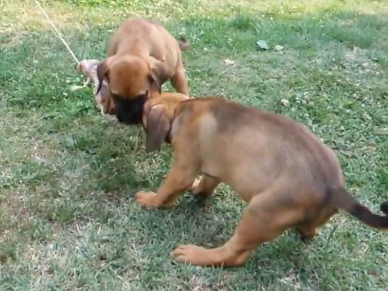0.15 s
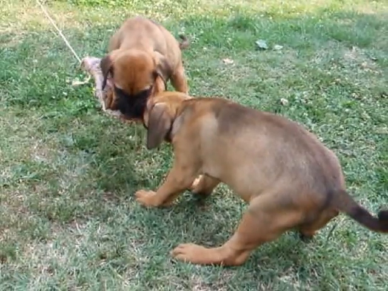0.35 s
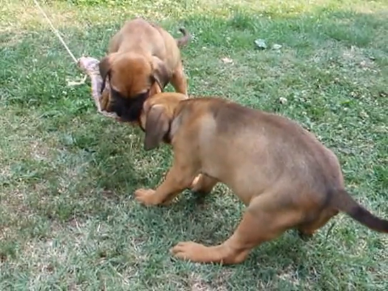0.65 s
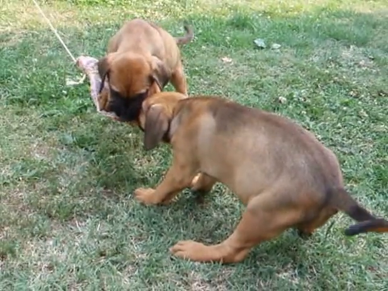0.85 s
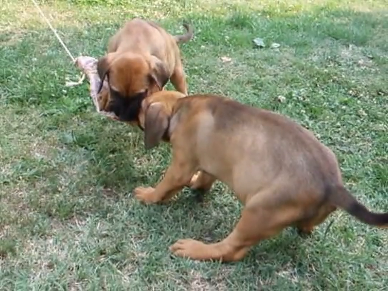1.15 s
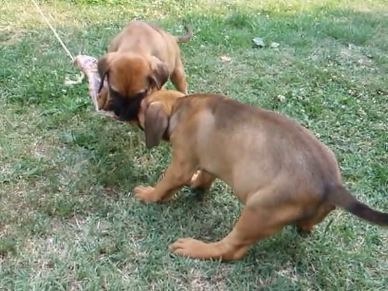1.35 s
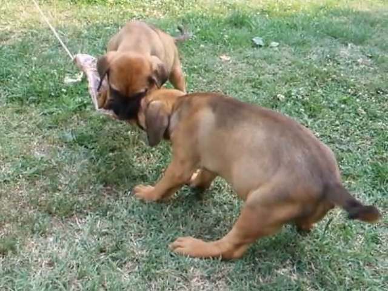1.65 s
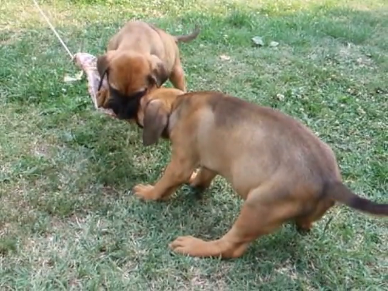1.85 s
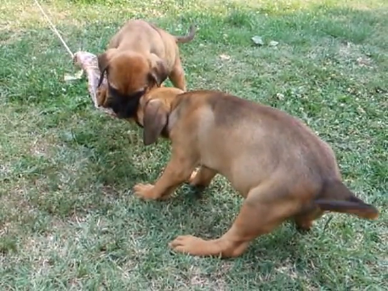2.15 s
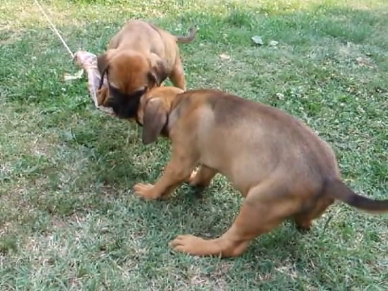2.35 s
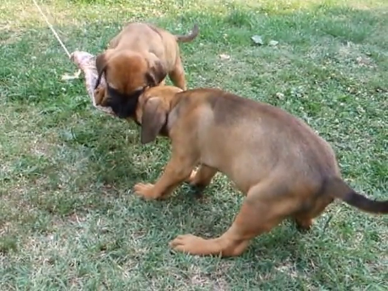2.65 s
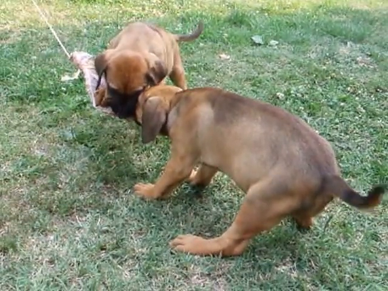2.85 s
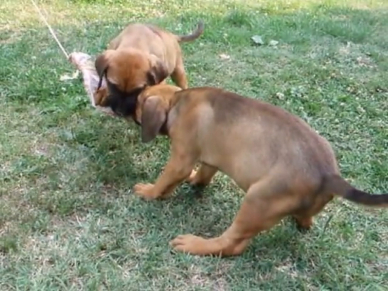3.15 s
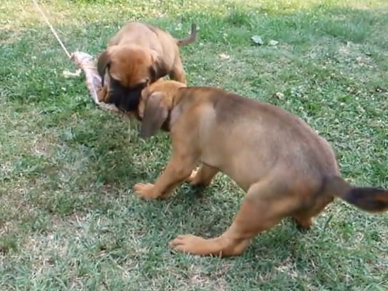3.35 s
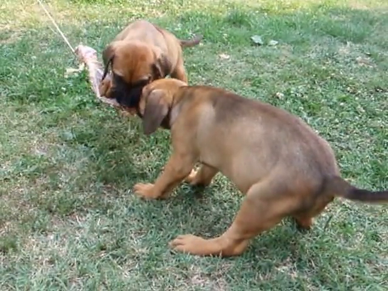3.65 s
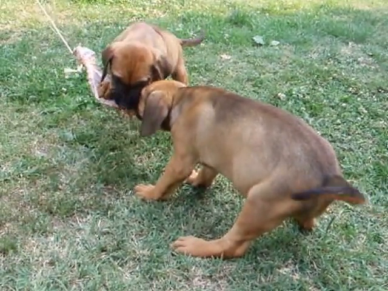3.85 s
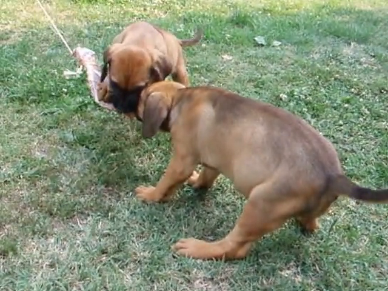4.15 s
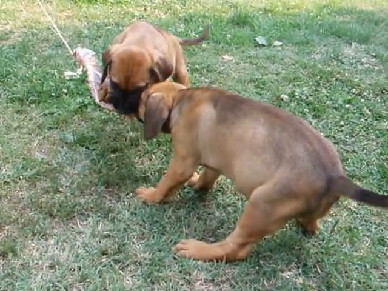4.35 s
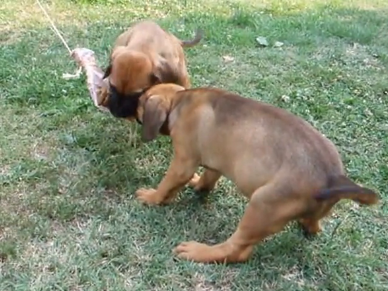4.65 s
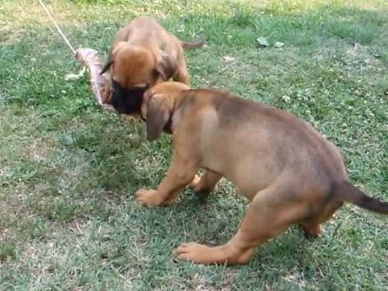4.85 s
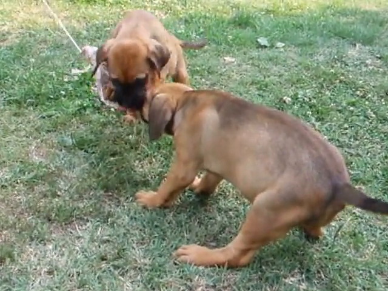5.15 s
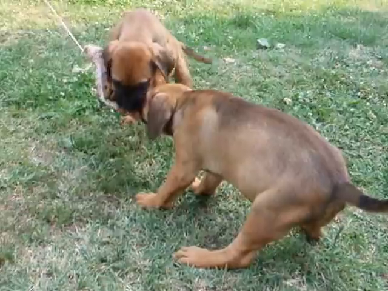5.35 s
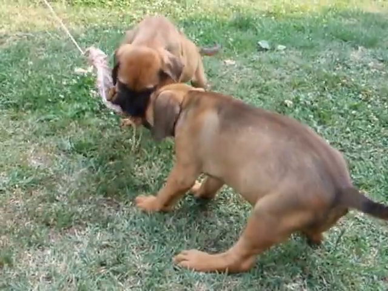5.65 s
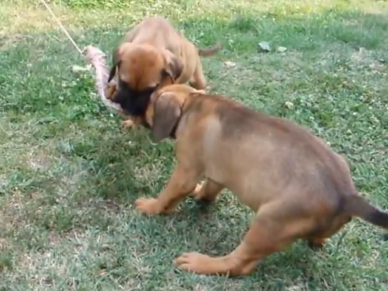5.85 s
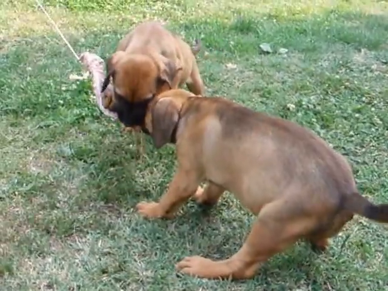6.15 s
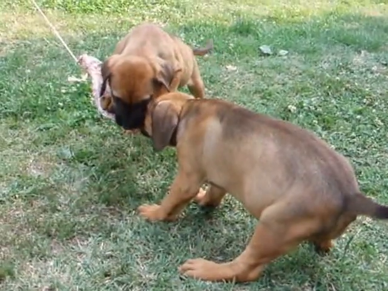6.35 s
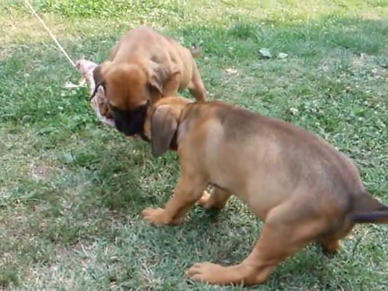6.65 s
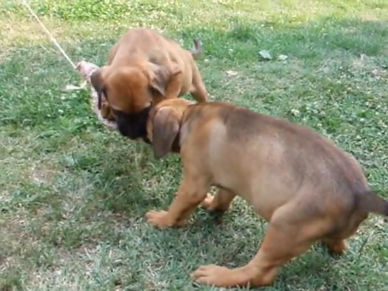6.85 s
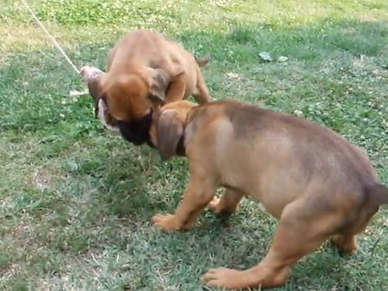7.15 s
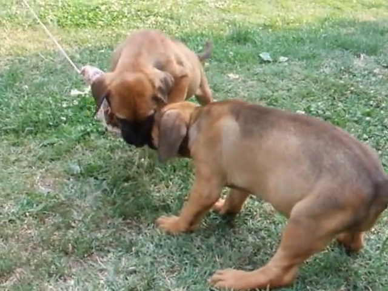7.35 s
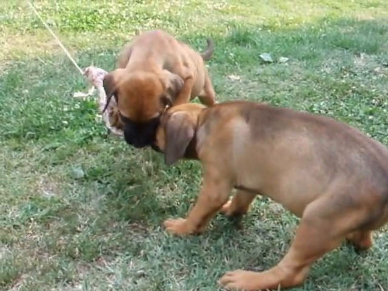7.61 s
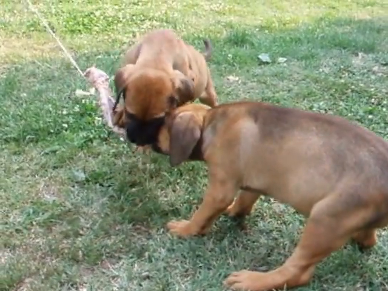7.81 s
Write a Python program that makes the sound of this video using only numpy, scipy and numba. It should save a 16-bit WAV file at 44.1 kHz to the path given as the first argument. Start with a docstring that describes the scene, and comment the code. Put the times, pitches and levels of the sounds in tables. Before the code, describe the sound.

Playful puppy growling carries on close to a small microphone in a yard with a weak echo. Five sharp yelps burst out of the growls in the first two thirds, and short snarls take over near the end. A quiet closed-mouth growl fills the gaps. Behind the dogs are a few faint bird whistles, a soft hiss of air and a steady thin whine.

```python
"""Two puppies tug at a toy on a lawn, over soft outdoor air and a small camera's thin whine.
First one growls, its vocal folds pulsing through chest, mouth and throat, while a far bird whistles.
At 1.4 s the growl breaks upward into a yelp; at 2.5 s it swells into a snarl. In the pause after it,
a faint slow growl rattles through a shut mouth, and it returns twice later. Four more yelps come from
3.2 to 5.5 s, then three snarls. The yard echoes weakly, and the hardest pulses overload the recorder."""
import sys
import numpy as np
from scipy import signal
from scipy.fft import rfft, irfft
from scipy.io import wavfile
from scipy.ndimage import uniform_filter1d
from numba import njit

SR = 44100
rng = np.random.default_rng(int(sys.argv[2]) if len(sys.argv) > 2 else 0)


def store_wav(level_fs):
    """Save 16-bit WAV to argv[1]."""
    pcm = np.round(np.clip(np.atleast_2d(level_fs), -1, 1) * 32767)
    wavfile.write(sys.argv[1], SR, pcm.T.astype(np.int16))


N = 351898
TIME = np.arange(N) / SR

# The plain growl, one list per phrase: time_s, pitch_hz, mouth_db, throat_db
GROWLS = [
    [(0, 141.3, -31.5, -36.5), (.06, 133.7, -39, -36), (.2, 154.9, -44.5, -36), (.31, 179.7, -41, -33),
     (.4, 193.5, -44, -32.5), (.46, 217, -30, -28), (.56, 198, -36, -31), (.9, 161.6, -35.5, -32),
     (.93, 143.1, -39, -37.5)],
    [(1.35, 112, -44, -38.5), (1.56, 159.8, -57, -39), (1.77, 158, -51.5, -39.5), (1.86, 163.4, -42, -35),
     (1.92, 172.7, -29, -30), (2.05, 184.2, -29, -26.5), (2.15, 179.6, -47.5, -34), (2.42, 167.5, -31, -32),
     (2.6, 186, -39, -34.5), (2.69, 165.1, -38.5, -35.5), (2.715, 149.6, -44, -41)],
    [(3.145, 124.9, -40, -33), (3.45, 158.6, -65, -41), (3.54, 156, -56, -37.5), (3.7, 156, -45, -36.5),
     (3.9, 161, -40, -34), (3.96, 176, -25.5, -30), (4.1, 159.6, -29, -32.5), (4.155, 148.2, -51, -40.5)],
    [(4.612, 190.2, -50, -33), (4.775, 150.1, -43, -41.5)],
    [(5.48, 180, -54, -40), (5.64, 161.5, -51, -41), (5.82, 162.5, -44.5, -44), (5.95, 170.1, -29, -35),
     (6.09, 171.3, -35.5, -34), (6.2, 163, -44, -40), (6.47, 157.9, -43, -37.5), (6.64, 162, -33, -32),
     (6.665, 145.8, -42, -49)],
    [(7.145, 130.4, -44, -41.5), (7.2, 156.1, -31.5, -30.5), (7.27, 174, -30, -35.5),
     (7.42, 157.2, -43, -39), (7.6, 169, -33, -33), (7.75, 161, -42.5, -35.5), (7.85, 169.7, -40, -34.5),
     (7.98, 155, -49, -45)],
]
# How the grip on the toy colours each phrase: roughness (0-1), main_throat_shift_hz
GRIPS = [(.22, 19.5), (.19, 14.5), (.19, 40), (.3, 31), (.17, -11), (.31, -130)]
# A wider mouth rings higher, and the throat mostly lower: mouth_db, mouth_ring_hz, main_throat_ring_hz
OPENING = [(-58, 857, 2456), (-38, 889, 2378), (-31.5, 895, 2390), (-18.5, 915, 2310)]
# The high notes at which throat and muzzle ring: ring_hz, width_hz, gain_db
THROAT_RINGS = [(3083, 840, -10), (4473, 560, -14.5)]
# How much those high notes are turned up or down: time_s, gain_db
BRIGHTNESS = [(0, -8.5), (.5, 2), (.9, -8), (1.6, -2), (1.95, 8), (2.55, -6.5), (3.5, 1), (4.1, -2.5),
              (4.6, -3), (5.8, -1.5), (6.12, 6), (6.4, -9), (6.57, -2), (7.25, -4), (7.6, -1), (7.98, 0)]
# The tone colour of outdoor air and microphone hiss: frequency_hz, relative_level_db
AIR_COLOUR = [(20, -72.5), (50, -83), (110, -84.5), (200, -79.5), (500, -84), (800, -87), (1300, -86.5),
              (1600, -85.5), (2300, -90), (4000, -88), (8000, -93.5)]
# The camera's thin whine: pitch_hz, level_db
WHINE = [(7852, -61), (7882, -73)]
# One arched bird whistle: age_s, pitch_hz, relative_level_db
WHISTLE = [(0, 2700, -14), (.022, 3700, -4), (.045, 4170, -2), (.075, 3900, -2), (.105, 3400, 0),
           (.13, 3080, -7)]
# Each time the bird calls: start_s, level_db
BIRD_CALLS = [(.145, -43), (1.118, -41), (4.725, -48), (5.805, -47), (7.105, -42)]
# Yelps: burst_s, wind_up_s, burst_throat_db, tone_start_s, tone_end_s, aimed_pitch_hz, tone_gain_db,
# collapse_gain_db, sink_back_s
YELPS = [ (1.397, .034, -13, 1.417, 1.484, 844, -1.5, 0, .05),
         (3.164, .024, -13, 3.179, 3.273, 900, 0, 0, .12),
         (3.989, .016, -12, 4.018, 4.080, 814.6, -1, -3.5, .035),
         (4.620, .005, -13.5, 4.629, 4.715, 931.4, 1.5, 0, .06),
         (5.486, .0016, -16, 5.487, 5.574, 925, 1.5, 2.5, 0.034), ]
# The rough voice just before a yelp's clear tone: pitch_hz, roughness (0-1), chest_db, mouth_db
BURST = (245, 0.63, -30, -25.5)
# The tone's loudness as its overtones slide past the ringing notes: aimed_pitch_hz, mouth_db, throat_db
TONE_LEVELS = [(699, -21, -10), (747, -26, -9.5), (786, -41, -10.5), (848.6, -47, -15.5), (901, -23.5, -20)]
# The rough voice just after the tone: pitch_hz, roughness (0-1), chest_db, mouth_db, throat_db
COLLAPSE = (285, 0.93, -25.5, -28, -20.5)
# Snarls: start_s, rise_s, hold_s, mouth_ring_hz, pitch_hz, roughness (0-1), chest_db, mouth_db, throat_db
SNARLS = [ (2.516, 0.025, .016, 928.6, 246, 0.32, -27, -19.5, -13),
          (6.002, .024, .044, 1200, 234.7, .1, -37, -19.5, -16.5),
          (6.54, .035, 0.054, 1052, 186.9, 0.14, -34, -25, -24.5),
          (7.535, 0.022, 0.02966, 876.7, 175, 0.24, -28.5, -25.5, -27), ]
# The faint growl, one list per phrase: time_s, pulse_rate_hz, level_db
FAINT_GROWLS = [
    [(2.71, 109.2, -44), (2.8, 95.5, -41.5), (2.95, 85.9, -46), (3.13, 80.7, -48)],
    [(4.77, 99.85, -43), (4.95, 96.05, -45), (5.15, 88.2, -44), (5.3, 80.13, -47.5), (5.47, 67.97, -48.5)],
    [(6.68, 89.6, -54), (6.85, 65.36, -51.5), (7.0, 80.6, -51), (7.15, 105.1, -42)],
]
# The notes at which a shut muzzle rings: ring_hz, width_hz, gain_db
MUZZLE_RINGS = [(209, 41, 2.5), (297, 16, -8), (477, 26, -4), (1404, 130, -13), (2080, 250, -25.5)]


def undb(db):
    """Turn decibels into a number to multiply by."""
    return 10 ** (np.asarray(db) / 20)


def smooth(x, seconds):
    """Round off quick changes by averaging twice."""
    size = max(int(seconds * SR), 1)
    return uniform_filter1d(uniform_filter1d(x, size), size)


def steady(x, seconds=0.01):
    """Even out a sound so its average strength stays near 1."""
    return x / np.sqrt(np.abs(smooth(x * x, seconds)) + 1e-6 * np.mean(x * x))


def wander(rate_hz):
    """A smooth random curve, typically about 1 away from zero."""
    x = smooth(rng.standard_normal(N), 1 / rate_hz)
    return x / x.std()


def keep(x, hz, side, order=4):
    """Keep the "low" or "high" side of a frequency; a higher order cuts more sharply."""
    return signal.sosfilt(signal.butter(order, min(hz, .45 * SR), side, fs=SR, output="sos"), x)


@njit
def moving_band(x, hz, width):
    """Let through one band of frequencies, whose centre may move."""
    out, band, low = np.empty(len(x)), 0., 0.
    for i in range(len(x)):
        tuning, damping = np.tan(np.pi * hz[i] / SR), width / hz[i]
        now = (band + tuning * (x[i] + 1e-18 - low)) / (1 + tuning * (tuning + damping))
        band, low = 2 * now - band, low + 2 * tuning * now
        out[i] = damping * now
    return out


def ring(x, hz, width):
    """Ring at one note, like the air in a hollow space."""
    return moving_band(x, hz + np.zeros(N), float(width))


def swell(start, end, rise, fall):
    """A curve that grows to 1, holds from start to end, then dies away."""
    away = np.maximum(start - TIME, 0) / rise + np.maximum(TIME - end, 0) / fall
    return np.exp(-np.minimum(away, 20))


def blend(voice, goal, share):
    """Pull each curve a share of the way to its goal."""
    return [now + share * (to - now) for now, to in zip(voice, goal)]


def phrase_curves(phrases, fade_s):
    """An on/off curve for the phrases, then one curve for each column after time."""
    times, *columns = np.vstack(phrases).T
    on = sum((TIME > p[0][0] - fade_s) & (TIME < p[-1][0] + fade_s) for p in phrases)
    return [smooth(np.minimum(on, 1.), fade_s)] + [np.interp(TIME, times, c) for c in columns]


def per_phrase(values):
    """Hold one value through each growl phrase."""
    edges = [point[0] for phrase in GROWLS for point in (phrase[0], phrase[-1])]
    return np.interp(TIME, edges, np.repeat(values, 2))


def slackness(hz, below_hz=156.57, range_hz=18.04):
    """How loose the vocal folds hang at a low pitch, from 0 to 1."""
    return np.clip((below_hz - hz) / range_hz, 0, 1)


def growl():
    """The plain growl's curves: slack folds make it rougher, and higher pitch makes the chest hum more."""
    on, hz, mouth_db, throat_db = phrase_curves(GROWLS, fade_s=.005)
    rough = per_phrase([rough for rough, _ in GRIPS]) + 0.1285 * slackness(hz)
    edge_fade_db = 16 * (1 - smooth(on, .035))
    chest_db = -31 + 7.5 * np.log2(hz / 171) - edge_fade_db
    return on, [hz, rough, chest_db, mouth_db, throat_db]


@njit
def vocal_folds(hz, timing_spread, size_spread, chance):
    """The folds snap shut again and again; each pulse has its own timing and strength."""
    pulses, phase = np.zeros(len(hz) + 16), np.zeros(len(hz))
    progress, cycle = 0., 0
    for i in range(8, len(hz)):
        step = hz[i] / SR * np.exp(timing_spread[i] * chance[cycle, 0])
        progress += step
        if progress >= 1:
            progress, cycle = progress - 1, cycle + 1
            size = np.exp(size_spread[i] * chance[cycle, 1])
            for j in range(-7, 8):  # spread the pulse so it can land between samples
                angle = np.pi * (j + progress / step + 1e-9)
                pulses[i + j] += size * np.sin(angle) / angle * np.cos(angle / 16) ** 2
        phase[i] = progress
    return pulses[:len(hz)], phase


def voice_box(hz, rough, effort):
    """Pulses with a rush of air after each one, as a cleaner mix and a raspier mix."""
    timing_spread = .005 * np.minimum(.15 + 5 * rough, 1) + .14 * rough ** 2
    size_spread = .07 * np.minimum(.2 + 5 * rough, 1) + 0.19 * rough
    chance = rng.standard_normal((N // 40, 2))
    pulses, phase = vocal_folds(smooth(hz, 0.0013), timing_spread, size_spread, chance)
    cycles = np.unwrap(phase, period=1)
    pulses = steady(pulses * (1 + 0.014 * np.cos(np.pi * cycles)))  # strong and weak take turns
    rush = steady(rng.standard_normal(N) * (np.exp(-phase / .4) + .2))
    rasp = 0.42 * (1 - .92 * effort) * np.minimum(6 * rough, 1.3)
    breath = np.sqrt(rasp) * rush
    return pulses + 0.41 * breath, np.sqrt(1 - rasp) * pulses + breath


def upper_throat(source, mouth_hz, main_hz, bright_db, effort, strain):
    """The throat rings at one strong note among weaker ones; the nose swallows narrow bands."""
    top = sum(undb(db + bright_db + 6 * strain) * ring(source, hz, w) for hz, w, db in THROAT_RINGS)
    out = ring(source, main_hz, 170) + top
    out += undb(-8 + 0.71 * effort - 20 * strain) * ring(source, 1.605 * mouth_hz, 410)
    out += undb(-10.5 + 2.2 * effort) * ring(source, 2053, 470)
    out -= .8 * ring(out, 1.223 * main_hz, 340)
    out -= .4 * ring(out, 4150, 300)
    out -= 0.34 * (1 - effort) * ring(out, 1.27 * mouth_hz, 200)
    return keep(out, 1285, "high", order=3)


def voice_curves(jolt_db=4, jolt_s=.006, hard_snarl_s=6.002):
    """Yelps and snarls take over from the growl; the ringing notes follow the opening of the mouth."""
    on, voice = growl()  # voice holds pitch, roughness, then chest, mouth and throat levels
    for row in YELPS:
        voice = yelp(voice, *row)
    hz, _, _, mouth_db, _ = voice
    opening_db, *notes = np.transpose(OPENING)
    mouth_hz, main_hz = (smooth(np.interp(mouth_db, opening_db, note), 0.048) for note in notes)
    rings = [main_hz, mouth_hz + 123 * slackness(hz)]  # the jaw hangs wider in a slack growl
    for row in SNARLS:
        rings, voice = snarl(rings, voice, *row)
    main_hz, mouth_hz = rings
    main_hz = main_hz + per_phrase([shift for _, shift in GRIPS])
    hz, rough, chest_db, mouth_db, throat_db = voice
    # the voice jumps briefly in level at each yelp and at the hardest snarl
    jolt_times = [hard_snarl_s] + [row[0] for row in YELPS]
    jolt = jolt_db * sum(swell(at, at, jolt_s, jolt_s) * (TIME >= at) for at in jolt_times)
    return on, main_hz, mouth_hz, hz, rough, chest_db, mouth_db + jolt, throat_db + jolt


def loud_puppy(flap_hz=25, flap_db=2.5, waver_db=1.5):
    """Growls, snarls and yelps from one throat; pushing harder makes the pulses crisp."""
    on, main_hz, mouth_hz, hz, rough, chest_db, mouth_db, throat_db = voice_curves()
    bright_db = np.interp(TIME, *np.transpose(BRIGHTNESS))
    effort = np.interp(throat_db, [-36, -17], [0, 1])
    strain = np.interp(hz, [300, 700], [0, 1])  # 1 in the high yelping voice
    # loose tissue flaps in a soft growl and shakes both pitch and level
    flap = np.sin(2 * np.pi * np.cumsum(flap_hz * (1 + 0.1979 * wander(15))) / SR)
    hz = hz * (1 + (.009 * flap + .008 * wander(25)) * (1 - effort))
    flutter_db = (flap_db * flap + waver_db * wander(37)) * (1 - effort)
    clean, raspy = voice_box(hz, np.clip(rough, 0, 1), effort)
    # the low hum comes through chest and nose even when the mouth is shut on the toy
    chest = ring(clean, 189, 157) - ring(clean, 335, 110) + undb(-1.5) * ring(clean, 493.4, 77.3)
    chest = keep(keep(chest, 140, "high"), 695, "low", order=6)
    mouth = keep(keep(ring(clean, mouth_hz, 84), 472, "high"), 2070, "low", order=3)
    mouth -= 0.84 * (1 - effort) * ring(mouth, 1.162 * mouth_hz, 300)  # the nose swallows this band
    throat = upper_throat(raspy + yelp_cracks(), mouth_hz, main_hz, bright_db, effort, strain)
    sizzle = keep(ring(raspy, 6700, 1000), 4400, "high", order=6)
    return -on * (steady(chest) * undb(chest_db + .5 * flutter_db)
                  + steady(mouth) * undb(mouth_db + flutter_db)
                  + keep(steady(throat), 4908, "low", order=20) * undb(throat_db + flutter_db)
                  + steady(sizzle) * undb(-45 + 0.38 * throat_db - 4.9 * strain + flutter_db))


def ground_bounce(x, delay_s=0.001927, strength=0.33):
    """A slightly late copy off the lawn colours the sound, and shifts as the heads move."""
    lag_s = delay_s * (1 + .12 * wander(3))
    return x + strength * np.interp(TIME - lag_s, TIME, x)


def background(air_db=-48):
    """Outdoor air, microphone hiss and the camera's whine."""
    hz, db = np.transpose(AIR_COLOUR)
    colour = undb(np.interp(np.log(np.fft.rfftfreq(N, 1 / SR) + 1), np.log(hz), db))
    air = irfft(rfft(rng.standard_normal(N)) * colour, N)
    whine = sum(np.sqrt(2) * undb(level) * np.sin(2 * np.pi * pitch * TIME) for pitch, level in WHINE)
    return air / air.std() * undb(air_db + .5 * wander(5)) + whine


def yard_echo(x):
    """Sound scatters back from the garden, then a smeared echo returns from a wall."""
    age = TIME[:SR]
    garden, wall = (.012, -24, 0.62), (.185, -31, 0.16)
    echoes = 0
    for delay_s, level_db, fade_s in (garden, wall):
        fade = (age > delay_s) * np.exp(-np.log(1000) * np.abs(age - delay_s) / fade_s)
        tail = rng.standard_normal(SR) * fade
        echoes = echoes + undb(level_db) * tail / np.linalg.norm(tail)
    return signal.fftconvolve(keep(x, 230, "high", order=2), echoes)[:N]


def bird(upper_ratio=1.12):
    """A whistle that rises and falls, with a weaker second voice just above it."""
    times, hz, db = np.transpose(WHISTLE)
    out = np.zeros(N)
    for start_s, call_db in BIRD_CALLS:
        age = TIME - start_s
        quiver = 1 + .016 * wander(1200)
        pitch_hz = smooth(np.interp(age, times, hz), 0.011) * quiver
        phase = 2 * np.pi * np.cumsum(pitch_hz) / SR
        on = (age > 0) * (age < times[-1])
        loudness = smooth(undb(np.interp(age, times, db) + call_db) * on, 0.0054)
        out += np.sqrt(2) * loudness * (np.sin(phase) + .3 * np.sin(upper_ratio * phase))
    return out


def yelp(voice, burst_s, wind_up_s, burst_db, start_s, end_s, top_hz, tone_db, collapse_db, sink_s,
         break_hz=701.3, lock_hz=891, sag_db=5):
    """The growl winds up, bursts, breaks into a clear arching tone, collapses and sinks back."""
    # loudness rises before the pitch does, and falls back before it too
    push = swell(burst_s, end_s, wind_up_s, wind_up_s) * np.where(TIME < burst_s, .84, 1) * (TIME < end_s)
    voice = blend(voice[:2], BURST[:2], push ** 2) + blend(voice[2:], (*BURST[2:], burst_db), push)
    sink = swell(end_s, end_s, sink_s, sink_s) * (TIME >= end_s)
    collapse_levels = np.add(COLLAPSE[2:], collapse_db)
    voice = blend(voice[:2], COLLAPSE[:2], sink) + blend(voice[2:], collapse_levels, sink ** 1.7)
    along = np.clip((TIME - start_s) / (end_s - start_s), 0, 1)
    aim_hz = break_hz + (top_hz - break_hz) * np.sin(np.pi * along ** 1.2)
    hz, *levels = np.transpose(TONE_LEVELS)
    mouth_db, throat_db = (np.interp(aim_hz, hz, db) + tone_db - sag_db * along for db in levels)
    tone_hz = np.minimum(aim_hz, lock_hz)  # a high tone locks onto the mouth's ringing note
    pitch = blend(voice[:1], [tone_hz], swell(start_s, end_s, rise=.007, fall=.015))
    clear = (0.031, -61, mouth_db, throat_db)  # hardly any roughness or chest hum
    return pitch + blend(voice[1:], clear, swell(start_s, end_s, rise=.005, fall=.005))


def yelp_cracks(strength=9):
    """The folds slam shut once as each yelp bursts out."""
    return np.bincount([int(row[0] * SR) for row in YELPS], minlength=N) * strength


def snarl(rings, voice, start_s, rise_s, hold_s, mouth_hz, *goal, fall_s=.018, jaw_slowness=2.3):
    """The growl swells while the jaw, moving more slowly, opens and closes."""
    jaw = swell(start_s, start_s + hold_s, jaw_slowness * rise_s, jaw_slowness * fall_s)
    push = swell(start_s, start_s + hold_s, rise_s, fall_s)
    open_throat_hz = OPENING[-1][2]
    return blend(rings, (open_throat_hz, mouth_hz), jaw), blend(voice, goal, push)


def faint_growl(timing_spread=.08, size_spread=.2):
    """Slow, separate pulses make a shut muzzle ring."""
    on, hz, level_db = phrase_curves(FAINT_GROWLS, fade_s=0.014)
    chance = rng.standard_normal((N // 40, 2))
    pulses, _ = vocal_folds(hz, np.full(N, timing_spread), np.full(N, size_spread), chance)
    muzzle = sum(undb(db) * ring(pulses, note, width) for note, width, db in MUZZLE_RINGS)
    muzzle = keep(keep(muzzle, 72, "high"), 2600, "low")
    return -on * undb(level_db) * steady(muzzle, 0.14)


def cut_treble(x, hz):
    """Very sharply remove the sound above a frequency."""
    return signal.sosfilt(signal.ellip(8, .3, 65, hz, fs=SR, output="sos"), x)


def scene():
    """Both puppies and the bird, with their echo and the background, in one channel."""
    voices = ground_bounce(loud_puppy() + faint_growl()) + bird()
    return (voices + yard_echo(voices) + background())[None]


def record(dry):
    """The recorder loses the high treble and flattens peaks that are too loud for it."""
    clipped = np.clip(cut_treble(dry, hz=8200), -1, 1)
    return cut_treble(clipped, hz=15800)


dry = scene()
out = record(dry)
store_wav(out)
```